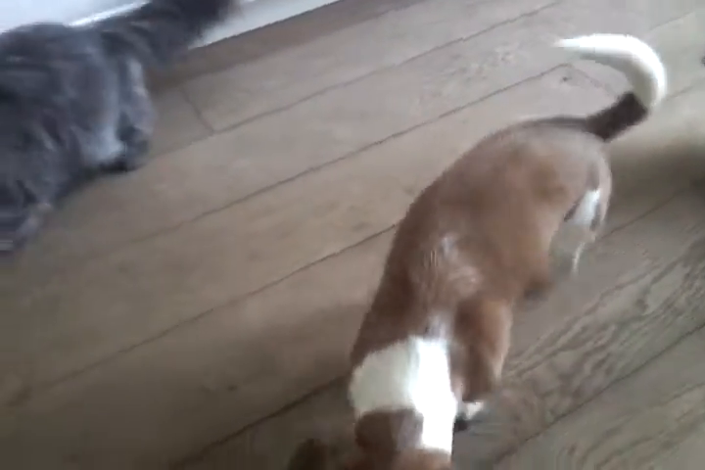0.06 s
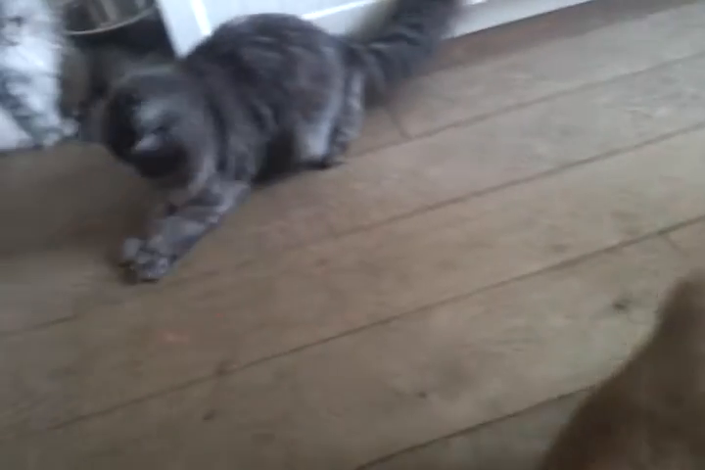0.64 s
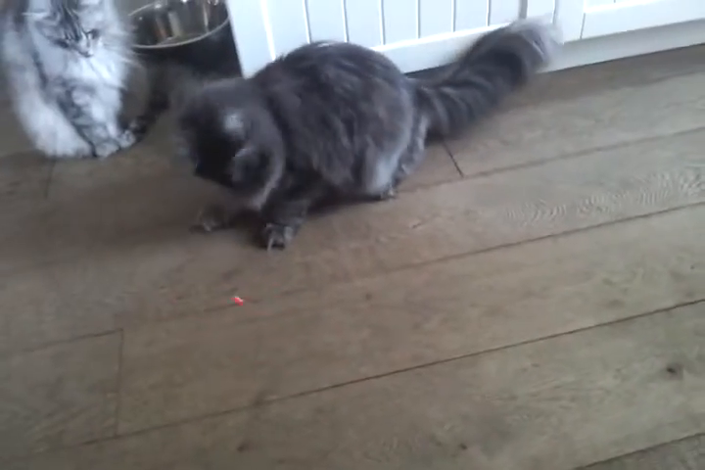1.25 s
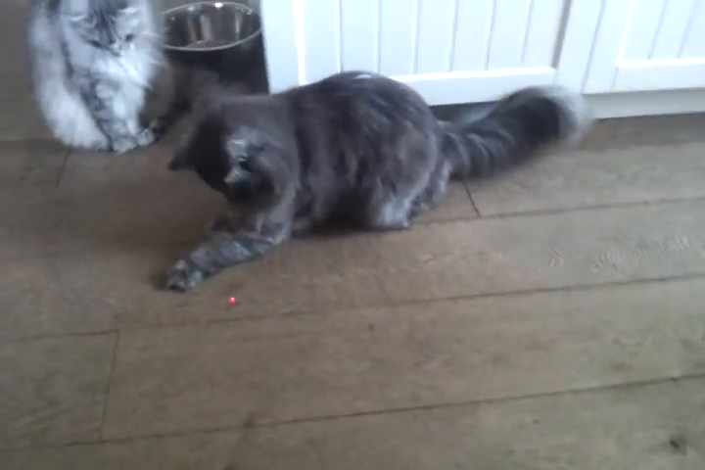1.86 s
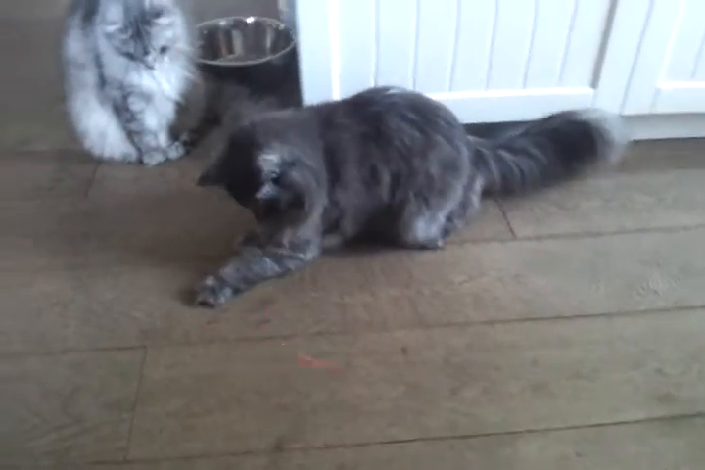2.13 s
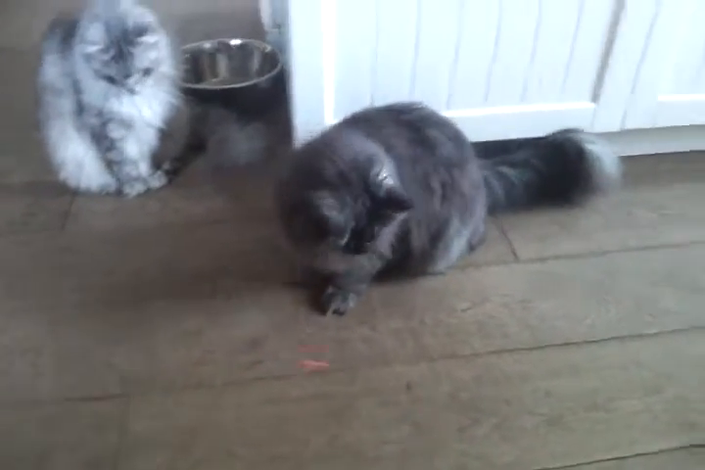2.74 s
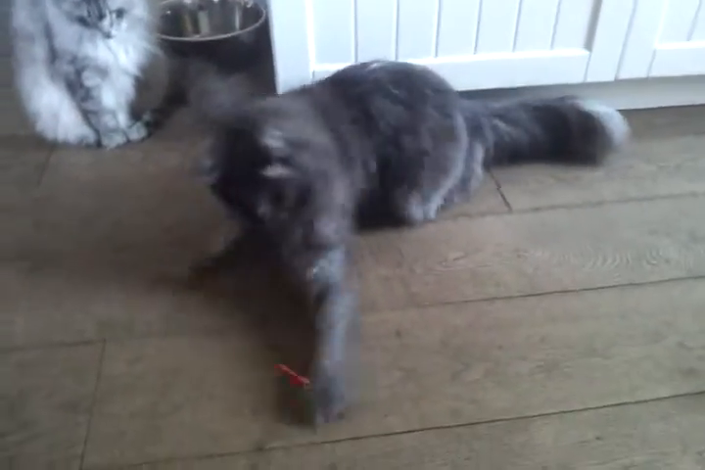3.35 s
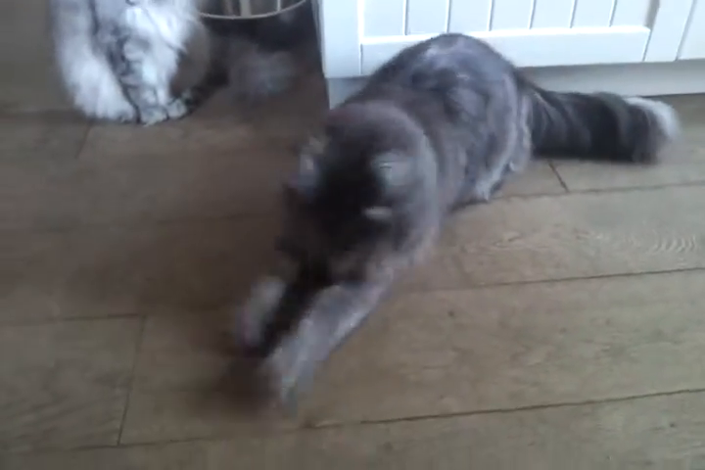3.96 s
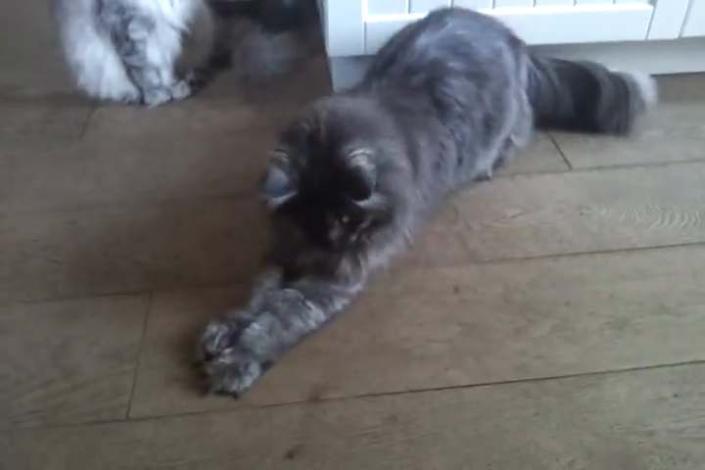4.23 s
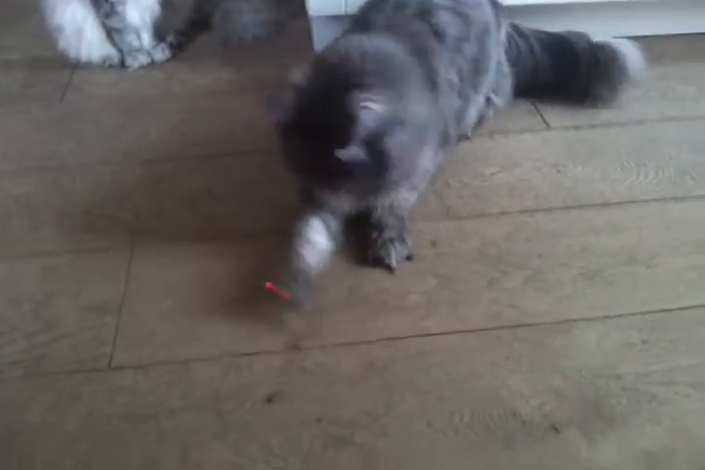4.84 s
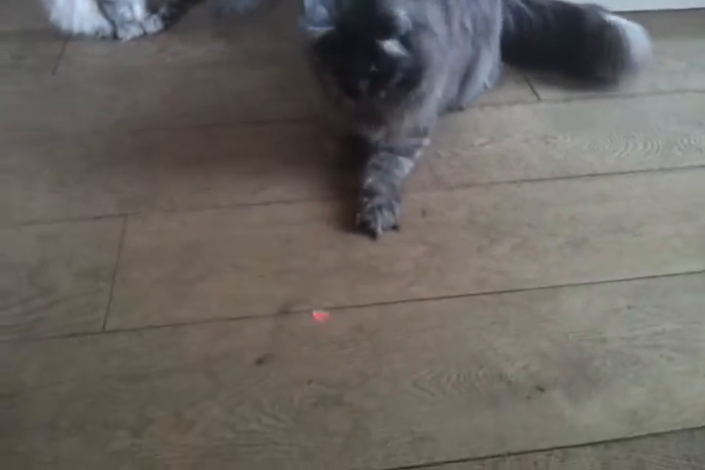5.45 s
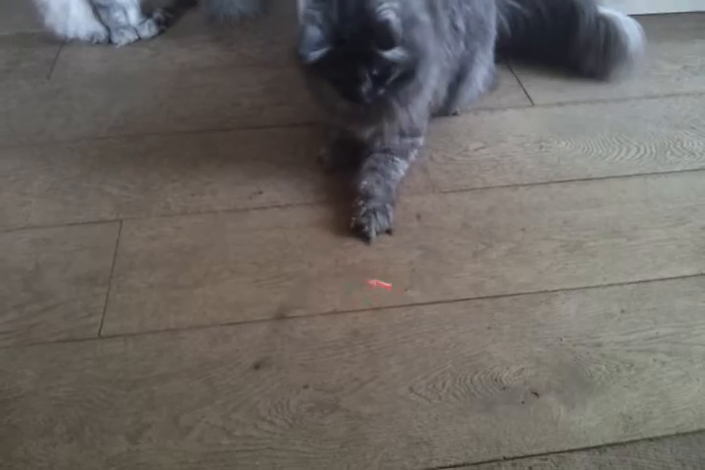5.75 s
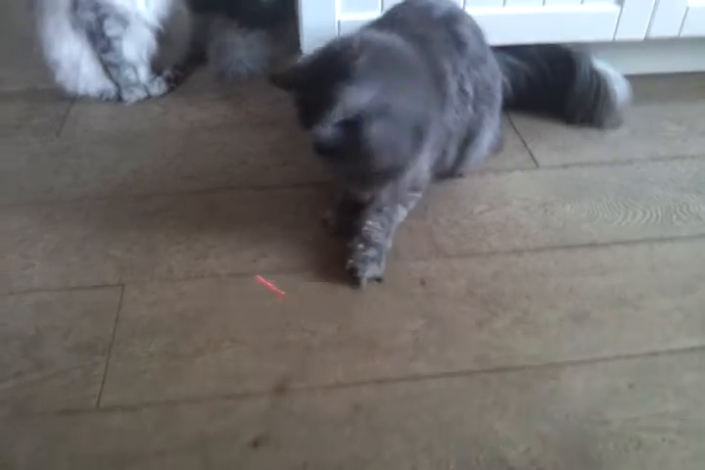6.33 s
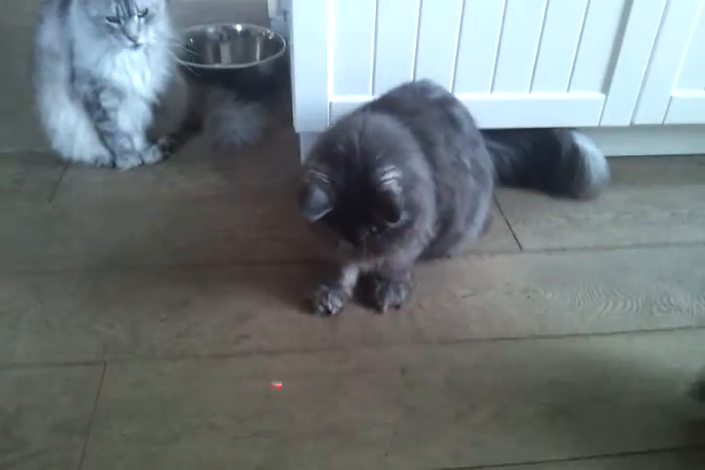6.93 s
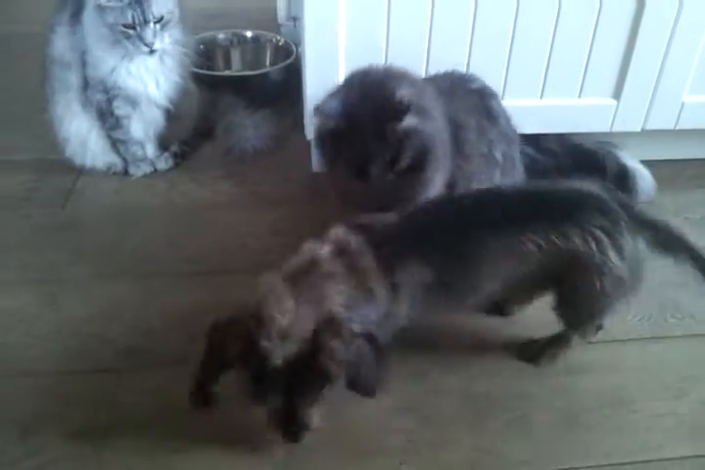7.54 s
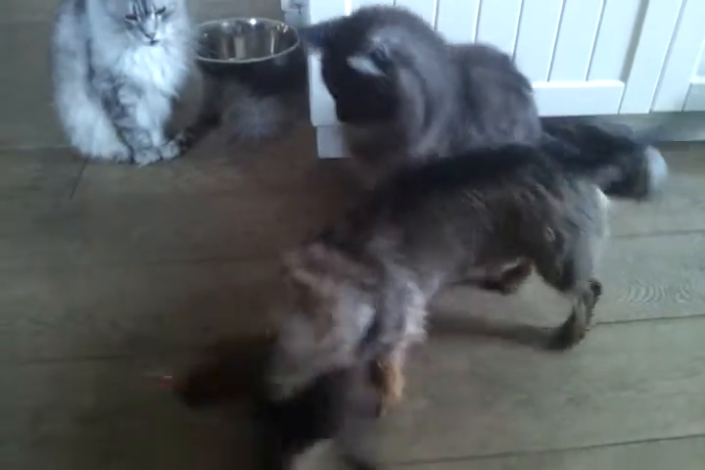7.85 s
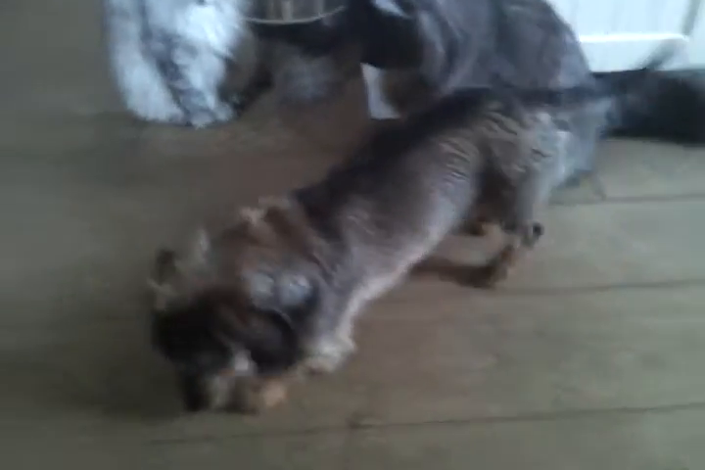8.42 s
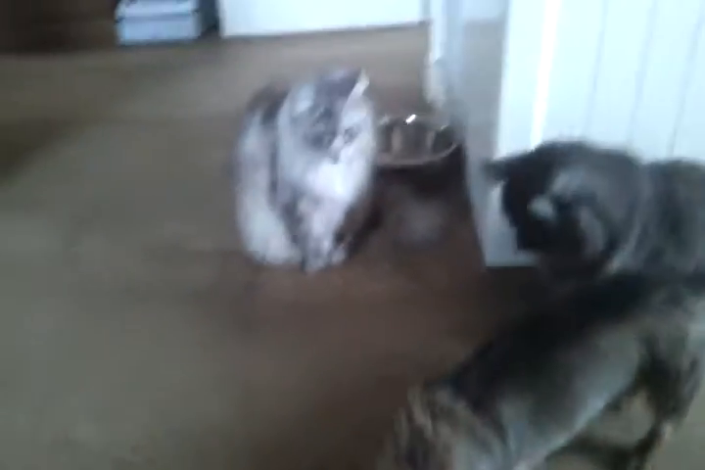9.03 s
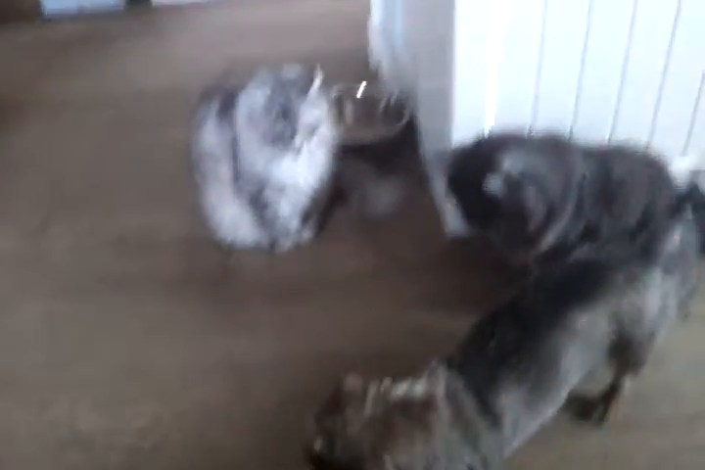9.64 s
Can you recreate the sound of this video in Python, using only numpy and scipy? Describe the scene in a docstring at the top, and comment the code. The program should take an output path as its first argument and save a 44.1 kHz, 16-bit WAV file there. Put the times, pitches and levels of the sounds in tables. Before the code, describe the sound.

Light, uneven claw taps on floorboards are heard close to a phone microphone in a small, bright kitchen, over steady hiss. Faint chirps and a tiny squeak come through at first, then the cat's paws land with dull thumps and slide along the wood. After two thin squeaks, a dog passes with heavier clicking and shuffling. A brief scrabble peaks in a loud knock, and scattered taps, thumps and scuffs carry on.

```python
"""A cat pounces about on a wooden kitchen floor while dogs trot past, close to a phone microphone.
Claws tick in tiny clusters, pads thump the boards into a short ring, and paws scuff along the grain.
One raking scrabble ends in a loud knock. Thin squeaks and a few faint bird-like chirps come through.
The room is small and bright, with quick bounces off cupboards and wall; steady hiss lies behind it all."""
import sys
import numpy as np
from scipy import signal
from scipy.fft import rfft, irfft
from scipy.io import wavfile

SR = 44100
rng = np.random.default_rng(int(sys.argv[2]) if len(sys.argv) > 2 else 0)


def materialize(psi):
    """Save the field psi as 16-bit PCM at rate SR to the path in sys.argv[1].

    A 1-D psi becomes a single channel; in a 2-D psi each row is a channel.
    """
    bounded = np.clip(np.atleast_2d(psi).T, -1, 1)
    quanta = np.round(bounded * 32767).astype(np.int16)
    wavfile.write(sys.argv[1], SR, quanta)


N = 426888
HIT = 4096  # samples that one hit lasts
LEAD_S = .01  # time left for the light touch ahead of a tap


def undb(db):
    """Decibels to gain."""
    return 10 ** (np.asarray(db) / 20)


def unit(x):
    """Scale to an rms of one."""
    return x / np.sqrt(np.mean(x ** 2) + 1e-20)


def blow(x, db):
    """Give a hit the energy of 4 ms at this level."""
    return x * undb(db) * np.sqrt(.004 * SR / np.sum(x ** 2))


def bins(size):
    """Frequencies of a spectrum of this many samples."""
    return np.maximum(np.arange(size // 2 + 1) * SR / size, 1)


def colour(x, points, extra_db=0):
    """Causal filter that follows (frequency_hz, gain_db) points."""
    size = len(x)
    hz, db = np.transpose(points)
    curve_db = np.interp(np.log(bins(size)), np.log(hz), db) + extra_db
    cepstrum = irfft(np.log(undb(curve_db)), size)
    cepstrum[1:size // 2] *= 2  # fold to minimum phase
    cepstrum[size // 2 + 1:] = 0
    return irfft(rfft(x) * np.exp(rfft(cepstrum)), size)


def add(out, start_s, x):
    """Mix x in from start_s."""
    i = max(int(start_s * SR), 0)
    out[i:i + len(x)] += x[:max(N - i, 0)]


def fade(t, t60):
    """Exponential decay that starts at t = 0."""
    return (t >= 0) * np.exp(-np.log(1000) * np.maximum(t, 0) / max(t60, 1e-4))


def walk(rate_hz, size):
    """Smooth random wander with a spread near one."""
    at = np.arange(size) / SR * rate_hz
    knots = int(at[-1]) + 2
    return np.interp(at, np.arange(knots), rng.standard_normal(knots))


# Tone of the background: frequency_hz, gain_db
HISS_COLOUR = [(15, -35.5), (25, -1.5), (59, 3.5), (133, -2), (193, 1.5), (286, -4), (529, -3), (803, -7.5),
               (1950, -8.5), (2960, -10.5), (5750, -10.5), (6840, -14), (7360, -22.5), (8120, -27),
               (8960, -38), (11600, -68), (19700, -120)]

def hiss(level_db=-56, waver_db=0.395, waver_hz=1.5826):
    """Steady hiss with a little low rumble, behind everything."""
    noise = unit(colour(rng.standard_normal(N), HISS_COLOUR))
    return noise * undb(level_db + waver_db * walk(waver_hz, N))


# Tone of the kitchen's echo: frequency_hz, gain_db
ECHO_COLOUR = [(100, -1.5), (450, 1.5), (1000, -1), (2000, 1), (4000, 0), (6500, -3), (8500, -3)]

def echo(low_t60=0.519, high_t60=0.444, build_s=0.0049, wall_s=0.03, wall_db=-13,
         cupboard_s=.0028, cupboard_db=-7):
    """A quick bounce off the cupboards, a later one off the wall, then a diffuse tail."""
    size = 2 ** 15
    t = np.arange(size) / SR
    low = signal.sosfilt(signal.butter(2, 3000, fs=SR, output="sos"), rng.standard_normal(size))
    high = signal.sosfilt(signal.butter(2, 3000, "high", fs=SR, output="sos"), rng.standard_normal(size))
    tail = (low * fade(t, low_t60) + high * fade(t, high_t60)) * (1 - np.exp(-t / build_s))
    wall = rng.standard_normal(size) * fade(t - wall_s, t60=0.043)
    response = colour(unit(tail) + undb(wall_db) * unit(wall), ECHO_COLOUR) / np.sqrt(size)
    response[int(cupboard_s * rng.uniform(.5, 1.5) * SR)] += undb(cupboard_db)
    return response


def kitchen(x):
    """The animals keep moving, so each second the room answers a little differently."""
    out = np.zeros(N)
    for second in range(N // SR + 2):
        at = np.arange(max(second - 1, 0) * SR, min((second + 1) * SR, N))
        crossfade = np.cos(np.pi / 2 * (at / SR - second))
        add(out, at[0] / SR, signal.fftconvolve(x[at] * crossfade, echo()))
    return out


def whistles(glides, waver, gain_db=0):
    """Nearly pure gliding tones with an unsteady pitch."""
    out = np.zeros(N)
    for glide in glides:
        times, hz, db = np.transpose(glide)
        t = np.arange(times[0], times[-1], 1 / SR)
        pitch = np.interp(t, times, hz) * (1 + waver * walk(500, len(t)))
        tone = np.sqrt(2) * np.sin(2 * np.pi * np.cumsum(pitch) / SR)
        envelope = undb(np.interp(t, times, db) + gain_db) * signal.windows.tukey(len(t), .2)
        add(out, times[0], tone * envelope)
    return out


# One list per chirp: time_s, pitch_hz, level_db
CHIRP_GLIDES = [
    [(.525, 2480, -61), (.55, 2625, -52.5), (.585, 2476, -61), (.615, 2690, -53)],
    [(1.635, 2255, -77.5), (1.655, 2226, -50.5), (1.675, 2290, -62)],
    [(1.715, 2275, -57), (1.74, 2327, -54), (1.77, 2260, -53), (1.805, 2320, -60), (1.822, 2645, -59),
     (1.838, 3100, -57)],
    [(2.595, 2470, -64.5), (2.625, 2298, -60.5), (2.67, 2167, -66.5)],
]

def chirps():
    """Short bird-like whistles, faint at the microphone."""
    return whistles(CHIRP_GLIDES, waver=.005)


# Tone of the rasp under a squeak: frequency_hz, gain_db
SQUEAK_RASP = [(500, -31), (1800, -7), (2700, 1), (3300, 1), (4400, -6), (5500, -2), (6500, 3.5),
               (7200, -11.5), (8000, -20)]
# One list per squeak: time_s, pitch_hz, relative_level_db
SQUEAK_GLIDES = [
    [(1.855, 5780, -57), (1.882, 5800, -43.5), (1.905, 5707, -58.5)],
    [(5.968, 6250, -58), (6.004, 6280, -35.5), (6.013, 6532, -28), (6.019, 6910, -41.5),
     (6.028, 6920, -26.5), (6.046, 6942, -29), (6.066, 6400, -37.5), (6.082, 6233, -34.5),
     (6.11, 6373, -36.5)],
    [(6.388, 6687, -59.5), (6.402, 6558, -33.5), (6.415, 6630, -55)],
]

def squeaks(gain_db=-5.5, half_db=-23, rasp_db=-13, rasp_follow=0.75, usual_db=-38):
    """A thin tone with a weak, unsteady half pitch, over a rasp that grows more slowly than the tone."""
    out = whistles(SQUEAK_GLIDES, waver=0.0046, gain_db=gain_db)
    octave_below = [np.array(glide) * [1, .5, 1] for glide in SQUEAK_GLIDES]
    out += whistles(octave_below, waver=0.0723, gain_db=half_db)
    for glide in SQUEAK_GLIDES:
        times, _, db = np.transpose(glide)
        out += scrape(times, usual_db + rasp_follow * (db - usual_db) + rasp_db, SQUEAK_RASP)
    return out


def slips(size, grain_db=4, grain_hz=2400, catch_db=2, catch_hz=120):
    """Friction: dense tiny slips over the grain of the wood, catching now and then."""
    noise = rng.standard_normal(size)
    return noise * undb(grain_db * walk(grain_hz, size) + catch_db * walk(catch_hz, size))


def scrape(times, db, points):
    """Friction of one colour that follows a level curve."""
    out = np.zeros(N)
    size = 2 * int((times[-1] - times[0]) * SR / 2)
    t = times[0] + np.arange(size) / SR
    add(out, times[0], unit(colour(slips(size), points)) * undb(np.interp(t, times, db)))
    return out


# Tone of paws rubbing on wood, here and in the scuffs: frequency_hz, gain_db
RUB_COLOUR = [(88, -42), (150, -10.5), (532, -5.5), (580, -4), (724, -6.5), (905, -5), (1060, -6.5),
              (1860, -1.5), (2170, -5.5), (3320, -3), (5940, -2), (7050, -5.5), (8960, -28), (11600, -85.5),
              (19700, -120)]
# A dog passing the microphone: time_s, relative_level_db
DOG_PASS = [(6.93, -50), (7.066, -47.5), (7.44, -38.5), (7.522, -40), (7.652, -46), (7.856, -46.5),
            (8.01, -46), (8.26, -63)]

def shuffle(gain_db=-3):
    """The trotting dog's feet rub the boards without a break."""
    return scrape(*np.transpose(DOG_PASS), RUB_COLOUR) * undb(gain_db)


# Paws sliding over the floor: start_s, length_s, relative_level_db
PAW_SLIDES = [(3.008, 0.0794, -41.5), (3.502, 0.068, -48), (3.575, 0.0577, -40), (3.662, 0.395, -48.5),
              (4.12, 0.091, -48), (4.639, 0.154, -54.5), (4.928, 0.175, -53.5), (5.697, 0.061, -58),
              (6.221, 0.218, -51.5), (6.40, 0.204, -47), (6.781, 0.102, -44.5), (6.985, 0.129, -44.5),
              (7.408, 0.103, -42), (7.582, 0.133, -46), (7.844, 0.061, -44), (8.179, 0.102, -47.5),
              (8.566, 0.0542, -45.5), (8.62, 0.183, -50.5), (8.709, 0.097, -40), (9.176, 0.069, -48),
              (9.378, 0.238, -39), (9.574, 0.104, -43)]

def scuffs(gain_db=-1, peak_share=0.313, roundness=0.688, tilt_db_per_octave=-1.7541):
    """Each slide of a paw swells quickly and ebbs more slowly."""
    out = np.zeros(N)
    for start_s, length_s, db in PAW_SLIDES:
        size = 2 * int(length_s * SR / 2)
        tilt_db = tilt_db_per_octave * np.log2(np.clip(bins(size), 300, 7000) / 3000)
        rub = unit(colour(slips(size), RUB_COLOUR, tilt_db))
        swell = np.interp(np.linspace(0, 1, size), [0, peak_share, 1], [0, 1, 0])
        add(out, start_s, rub * np.sin(np.pi / 2 * swell) ** roundness * undb(db + gain_db))
    return out


# A floorboard's modes: pitch_ratio, gain_db, ring_time_share
BOARD_MODES = [(.62, -10, 0.47), (1.002, 2, 1), (1.449, -7, 0.32), (2.301, -13.5, 0.72)]
# Tone of a pad's dull slap: frequency_hz, gain_db
PAD_SLAP = [(100, -13), (250, -3), (450, 1.5), (700, -1), (1200, -14.5), (2500, -20), (6000, -32.5)]
# Pads landing near the microphone: start_s, relative_level_db, board_pitch_hz
PAD_LANDINGS = [(.009, -45.5, 438), (3.019, -34.5, 481), (3.044, -40.5, 475), (3.147, -41.5, 491),
                (3.511, -34, 325.4), (3.57, -39.5, 515), (3.744, -39.5, 467), (3.94, -42, 503),
                (3.972, -40, 446), (4.139, -41.5, 448), (4.714, -43.5, 528), (6.129, -36.5, 541),
                (6.32, -35.5, 450.4), (6.331, -41.5, 514), (6.71, -44, 425), (6.95, -46.5, 836),
                (7.342, -34.5, 431), (7.515, -44, 455), (7.591, -42, 490), (7.943, -31.5, 428),
                (7.964, -37.5, 440), (8.296, -30, 601), (9.031, -42.5, 1066), (9.243, -28, 461),
                (9.46, -34.5, 586), (9.532, -35.5, 429)]

def pads(gain_db=-2, push_s=0.0014, slap_db=-7.5, slap_t60=0.067, usual_t60=0.0265, usual_db=-40):
    """A soft push rings a floorboard's low, well-damped modes, with a dull slap as the toes spread."""
    out, t = np.zeros(N), np.arange(HIT) / SR
    push = 1 - np.exp(-t / push_s)
    for start_s, db, hz in PAD_LANDINGS:
        t60 = usual_t60 * np.exp(-0.04 * (db - usual_db))  # harder landings die away sooner
        ring = sum(undb(mode_db) * fade(t, t60 * share) * np.sin(2 * np.pi * hz * ratio * t)
                   for ratio, mode_db, share in BOARD_MODES)
        slap = colour(rng.standard_normal(HIT) * fade(t, slap_t60) * push, PAD_SLAP)
        add(out, start_s, blow(ring * push, db + gain_db) + blow(slap, db + slap_db))
    return out


# Claws raking the floor: time_s, relative_level_db
RAKE = [(8.26, -53), (8.268, -33), (8.282, -35), (8.322, -19), (8.334, -28.5), (8.38, -38.5)]
# Tone of the rake and the strikes: frequency_hz, gain_db
STRIKE_COLOUR = [(150, -21), (400, -15.5), (750, -14.5), (1300, -11.5), (2000, -7.5), (2500, -8.5),
                 (3200, -1), (4000, -0.5), (4900, -2), (5900, -2), (6900, -4.5), (8500, -26.5)]
# What rings in the knock: pitch_hz, gain_db, t60_s
STRIKE_MODES = [(1917, -11.5, 0.16), (3950, -17.5, 0.044), (4524, -13.5, 0.045), (5940, 8, 0.054)]
# The strikes of the knock: start_s, relative_level_db
STRIKES = [(8.305, -31), (8.3162, -19), (8.3206, -16), (8.325, -22), (8.328, -26.5)]

def knock(gain_db=-1, ring_db=-11, rake_db=-3.5, crack_t60=.0097):
    """A raking scrabble swells into a few crowded strikes, heard as one sharp knock."""
    out = scrape(*np.transpose(RAKE), STRIKE_COLOUR) * undb(rake_db)
    t = np.arange(HIT) / SR
    for start_s, db in STRIKES:
        crack = colour(rng.standard_normal(HIT) * fade(t, crack_t60), STRIKE_COLOUR)
        ring = sum(undb(mode_db) * rng.standard_normal() * fade(t, t60) * np.sin(2 * np.pi * hz * t)
                   for hz, mode_db, t60 in STRIKE_MODES)
        add(out, start_s, blow(crack, db + gain_db) + blow(ring, db + ring_db))
    return out


# Tone of a claw's bare tick: frequency_hz, gain_db
CLAW_TICK = [(150, -14), (450, -3.5), (900, -2.5), (1700, 1), (2700, 2), (4000, 4.5), (5500, 4), (6800, 3),
             (7600, -9.5), (8800, -21.5)]

def tap(drag, ring_hz, body_db, tick_t60=0.00494, touch_s=.002, spread_s=.004, side_db=-6,
        ring_db=4, ring_width_hz=700, body_hz=2400):
    """A light touch, the main claw, then its neighbours within a few ms."""
    f, t = bins(HIT), np.arange(HIT) / SR - LEAD_S - touch_s / 2
    lags = drag * np.array([-touch_s * rng.uniform(.5, 1), *rng.uniform(0, spread_s, 2)])
    gains = undb(side_db + 2 * rng.standard_normal(3))
    side_power = sum((gain * fade(t - lag, drag * tick_t60)) ** 2 for lag, gain in zip(lags, gains))
    envelope = np.sqrt(fade(t, tick_t60) ** 2 + side_power)
    peak_db = ring_db / (1 + ((f - ring_hz) / ring_width_hz) ** 2)
    wood_db = 0.664 * (body_db + 12) / (1 + (f / body_hz) ** 4)  # heavier taps move the board more
    return colour(envelope * rng.standard_normal(HIT), CLAW_TICK, peak_db + wood_db)


# How long the claws drag, longest as the heavier dog trots past: time_s, stretch_ratio
CLAW_DRAG = [(0, 1.2), (4.1, 1.0), (6.3, 1.2), (6.8, 2.2), (7.9, 2.2), (8.3, 1.2), (9.3, .9)]
# Claws landing close by: start_s, relative_level_db, ring_hz, relative_body_db, toe_lag_s (0 for none)
CLAW_LANDINGS = [(.0034, -47.5, 6050, -15.5, 0), (0.1692, -40.5, 5840, -1.5, 0),
                 (0.198, -49, 2020, -7.5, 0), (0.4252, -41, 5560, -15, 0), (.623, -36, 5330, -7, 0),
                 (0.849, -39, 4320, -10, 0), (1.0198, -42, 5600, -11.5, .0327),
                 (1.138, -47.5, 3270, -11.5, 0), (1.253, -41, 5430, -1.5, 0),
                 (1.3962, -41, 5950, -4, .0293), (1.6129, -41, 3630, -4, .032),
                 (1.8732, -42, 5700, -8.5, 0), (1.991, -42.5, 6070, -14, .0188),
                 (2.1191, -44.5, 1570, 1, 0), (2.142, -41, 6230, -24, 0), (2.387, -47.5, 5930, -18.5, 0),
                 (2.4, -40, 5010, -12, 0), (2.5415, -45.5, 5410, -15, .0265), (2.781, -36.5, 5630, -11, 0),
                 (2.8991, -38.5, 6170, -15, 0), (2.9703, -41, 3670, -11.5, 0),
                 (3.02, -40.5, 3320, -21, .024), (3.1125, -36.5, 5700, -12, .0257),
                 (3.2221, -44.5, 4190, 1, 0), (3.4146, -41.5, 4940, -9.5, .0159),
                 (3.502, -38.5, 3770, 15, 0), (3.5711, -31, 1700, -4.5, 0), (3.5755, -31.5, 1670, -9.5, 0),
                 (3.699, -38.5, 5660, -7, 0), (3.7628, -40.5, 3400, -13.5, 0),
                 (4.0102, -37.5, 4960, -15, 0), (4.0862, -40, 5200, 0, 0), (4.1384, -41.5, 4160, -14.5, 0),
                 (4.2454, -47, 4480, -9.5, 0), (4.2714, -40.5, 4440, -9.5, 0), (4.37, -42, 6220, -5.5, 0),
                 (4.4467, -44.5, 1750, 3, 0), (4.5665, -39.5, 3590, -9.5, .0199),
                 (4.6613, -45.5, 2170, -3, .0284), (4.7323, -43.5, 2400, -16.5, .0207),
                 (4.8292, -35.5, 4530, -14.5, 0), (4.8522, -35, 4390, -10.5, 0),
                 (5.1287, -38, 6170, -9.5, .0167), (5.2446, -45, 2106, -6, 0), (5.363, -50, 2750, -16, 0),
                 (5.4073, -43, 2240, -7, 0), (5.5024, -45, 3430, -10, 0), (5.7076, -46, 3180, -6, 0),
                 (6.2062, -44.5, 6290, -7.5, 0), (6.6432, -36, 5300, -5.5, 0), (6.711, -32, 1960, -0.5, 0),
                 (6.8561, -36, 4230, -1, 0), (6.9558, -37.5, 6070, -0.5, 0), (7.001, -34.5, 2730, -1.5, 0),
                 (7.103, -34, 6260, -3, 0), (7.1652, -33.5, 1730, 0.5, 0), (7.173, -36, 4710, -5.5, 0),
                 (7.242, -29, 4870, -20.5, 0), (7.2475, -35, 4320, -16.5, 0), (7.3425, -42, 3930, 7, 0),
                 (7.42, -30.5, 3850, -20.5, 0), (7.4535, -29.5, 4700, 1.5, 0),
                 (7.5513, -33.5, 3450, -25.5, .038), (7.8483, -40, 6200, -10, 0),
                 (7.987, -39, 4320, -15, 0), (8.1725, -41.5, 4010, -17.5, 0), (8.59, -36.5, 5870, -11.5, 0),
                 (8.9071, -40.5, 6070, -9.5, .0334), (8.9484, -46.5, 6240, -27, 0),
                 (9.0313, -41.5, 2000, 6, 0), (9.1496, -48, 5090, -18, .011), (9.2417, -41.5, 1710, 5, 0)]

def claws(second_db=-2, second_body_db=-5.5):
    """Each paw taps once, sometimes again with a softer, thinner second toe."""
    out = np.zeros(N)
    first_toes = [row[:4] for row in CLAW_LANDINGS]
    second_toes = [(start_s + lag_s, db + second_db, hz, body_db + second_body_db)
                   for start_s, db, hz, body_db, lag_s in CLAW_LANDINGS if lag_s > 0]
    for start_s, db, hz, body_db in first_toes + second_toes:
        drag = np.interp(start_s, *np.transpose(CLAW_DRAG))
        add(out, start_s - LEAD_S, blow(tap(drag, hz, body_db), db))
    return out


# Taps sent to the room, least when the paws are near the microphone: time_s, send_db
TAP_SEND = [(0, -3), (3.3, 0), (4.2, -2.5), (5.0, -0.5), (8.5, -1), (8.9, -6.5)]

def scene():
    """Each source reaches the microphone directly and through the room; the nearer ones are drier."""
    tap_send_db = np.interp(np.arange(N) / SR, *np.transpose(TAP_SEND))
    sources = [(claws(), tap_send_db), (pads(), -10), (scuffs() + shuffle(), -8.5),
               (knock(), -3.5), (squeaks(), -1.5), (chirps(), -9.5)]
    direct = sum(sound for sound, _ in sources)
    sent = sum(sound * undb(send_db) for sound, send_db in sources)
    return (direct + kitchen(sent) + hiss())[None]


# Treble response of the phone microphone: frequency_hz, gain_db
MIC_TREBLE = [(6000, 0), (6900, 0), (7400, -4), (7950, -13), (8600, -10), (9100, -13)]

def record(dry):
    """One phone microphone, mono: its treble falls away above 7 kHz and is cut near 9 kHz."""
    top_cut = signal.ellip(10, .2, 70, 8950, fs=SR, output="sos")
    return signal.sosfilt(top_cut, colour(dry[0], MIC_TREBLE))[None]


dry = scene()
out = record(dry)
materialize(out)
```